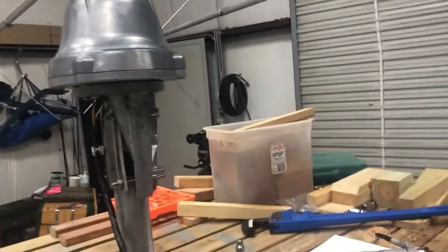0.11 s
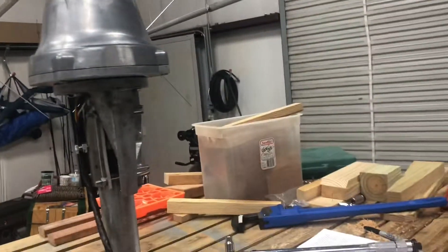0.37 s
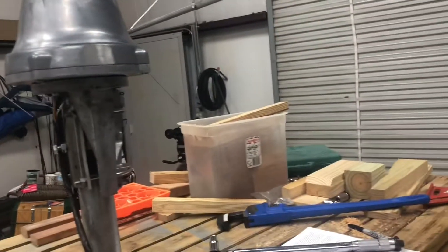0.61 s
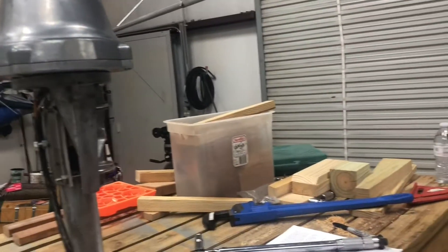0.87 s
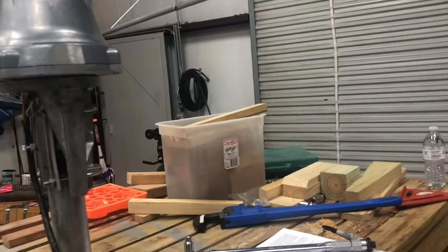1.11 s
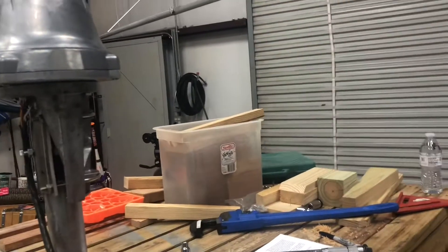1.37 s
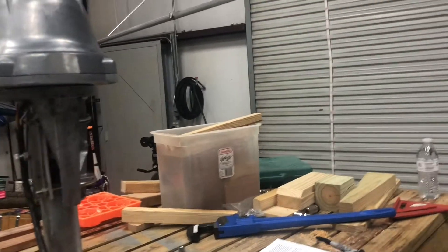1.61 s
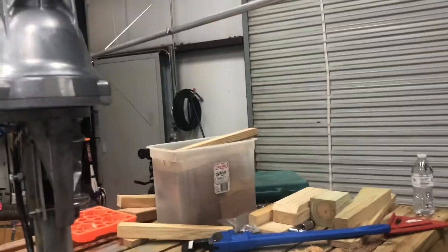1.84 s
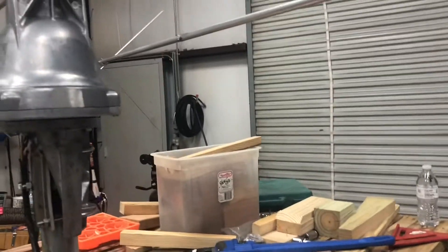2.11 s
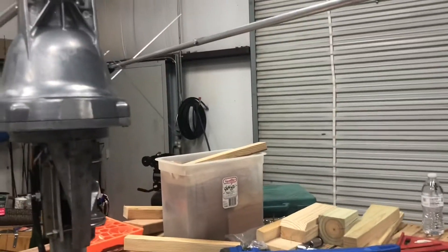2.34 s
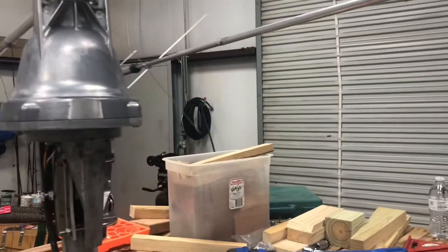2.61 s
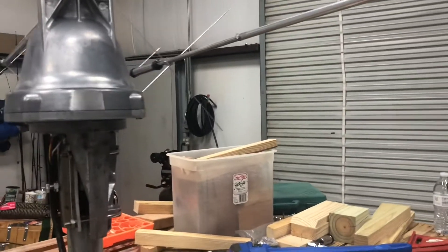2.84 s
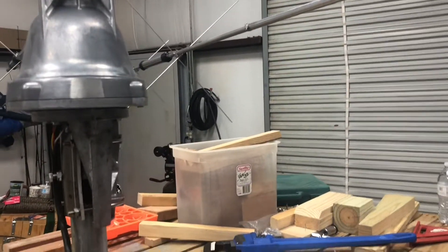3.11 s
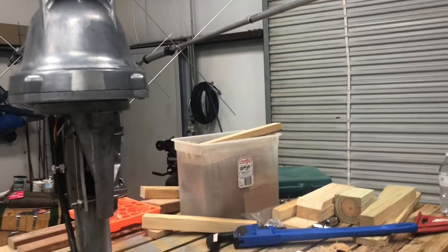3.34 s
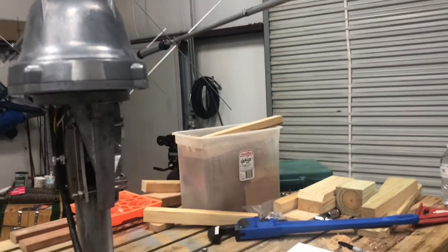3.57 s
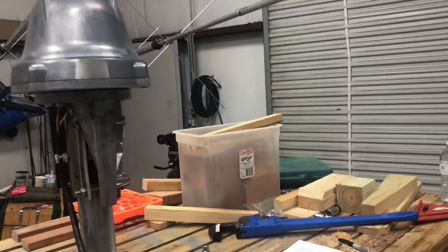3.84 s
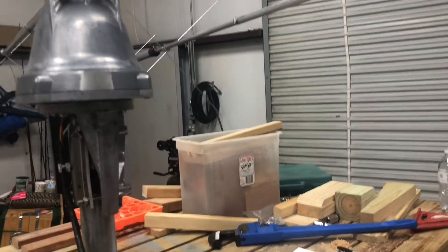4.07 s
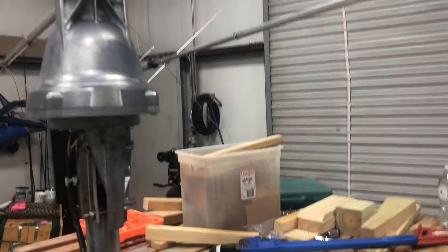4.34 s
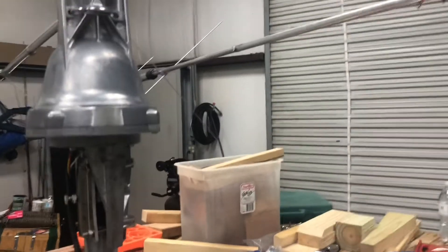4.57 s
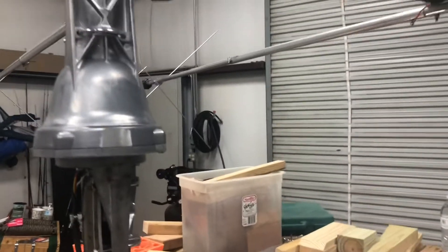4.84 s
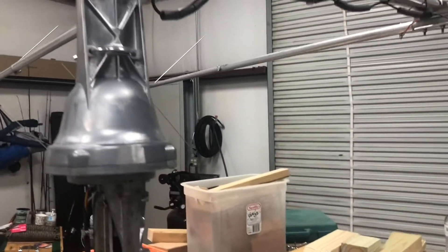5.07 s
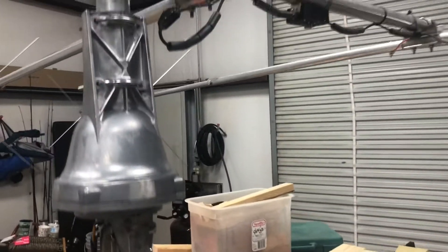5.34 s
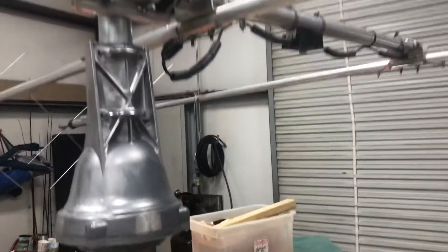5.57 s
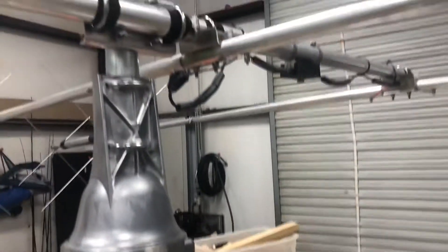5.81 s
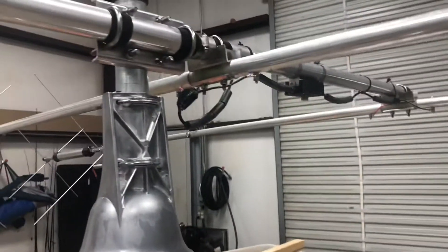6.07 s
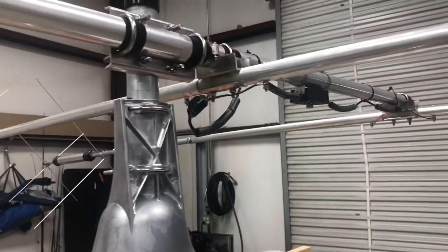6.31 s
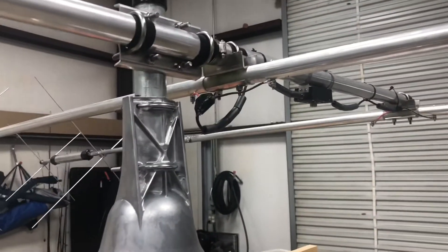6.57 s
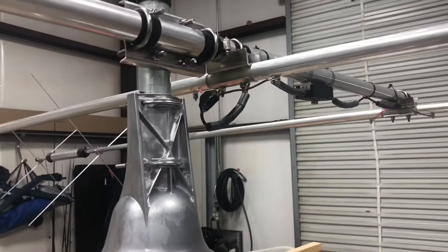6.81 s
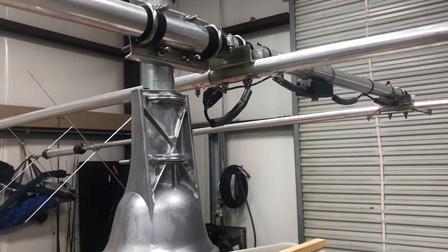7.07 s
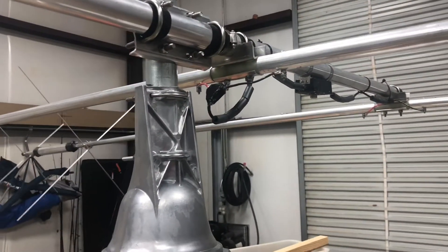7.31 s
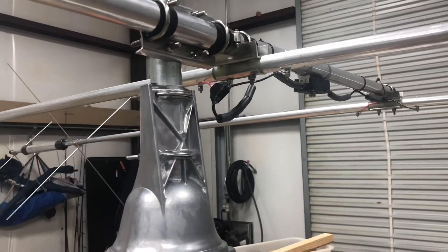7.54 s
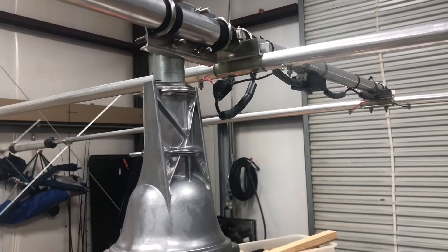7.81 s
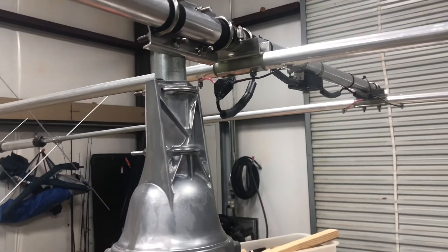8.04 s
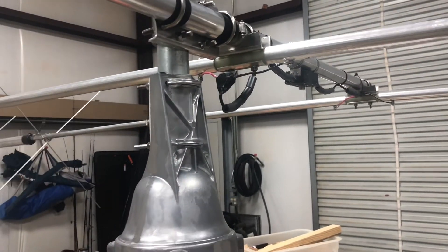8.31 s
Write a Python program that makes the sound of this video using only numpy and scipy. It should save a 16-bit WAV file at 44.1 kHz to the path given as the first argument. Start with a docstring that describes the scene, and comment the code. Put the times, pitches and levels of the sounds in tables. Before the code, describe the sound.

A handheld microphone moves from below a cast metal bell-shaped housing to above it. After quiet ticks, a small motor starts with a thump, its gears clattering and growling under a high nasal whine. Power drops, a few hollow knocks follow, then a second start and a long, steady rattling run with irregular gear clashes and slight sags in pitch, in a lightly echoing workshop.

```python
"""Small motor and gearbox in a metal bell

An induction motor turns an antenna in a workshop: a short run, a coast, then a long run to the end.
Rotor slots whine against the mains field, as sums of sine tones; the pinion sings when load slows the shaft.
Loose gears rattle, as dense random impacts that ring the cast housing and clash with the motor's slip.
The housing thumps at each start. Switches click and small knocks ring as short bursts and fading tones.
Quiet coloured noise is the room, with a hiss dying away at first and a low hum swelling in late."""
import sys
import numpy as np
from scipy import signal
from scipy.fft import rfft, irfft
from scipy.io import wavfile
from scipy.ndimage import uniform_filter1d

SR = 44100
rng = np.random.default_rng(int(sys.argv[2]) if len(sys.argv) > 2 else 0)


def boost(x):
    """Linear amplitude factor 10**(x/20) for a level x in decibels (scalar or array-like)."""
    u = np.asarray(x, float) / 20
    return 10 ** u


def unload_wav(signal):
    """Save mono or channel-first audio to the path in sys.argv[1] as 16-bit WAV at rate SR, clipped to [-1, 1]."""
    wavfile.write(
        sys.argv[1],
        SR,
        np.round(np.clip(np.atleast_2d(signal).T, -1, 1) * 32767).astype(np.int16),
    )


N = 371322
TIME = np.arange(N) / SR

MAINS_HZ = 60.0
STILL_S = 3.68  # the coasting gears come to rest
# when the motor has power: (on t/s, off t/s)
POWER = [(1.73, 2.97), (4.05, 8.5)]


def evened(x):
    """Scales a sound to rms 1."""
    return x / np.sqrt(np.mean(x ** 2) + 1e-20)


def read(points, hz):
    """Reads a spectrum between its points, on a log-frequency axis."""
    f, value = np.transpose(points)
    return np.interp(np.log(hz + 1), np.log(f + 1), value)


def add(mix, s, sound):
    """Mixes a sound in at s seconds."""
    part = mix[round(s * SR):][:len(sound)]
    part += sound[:len(part)]


def drift(rate_hz):
    """Smoothed chance of rms 1 that wanders about as fast as rate_hz."""
    steps = uniform_filter1d(rng.standard_normal(N // 100 + 2), size=5)
    slow = signal.lfilter([1], [1, -np.exp(-2 * np.pi * rate_hz * 100 / SR)], steps)
    return np.interp(np.arange(N) / 100, np.arange(len(slow)), evened(slow))


def coloured(db_of, gain):
    """Noise shaped to a given spectrum, evened, then scaled by the gain."""
    hz = np.fft.rfftfreq(N, 1 / SR)
    return gain * evened(irfft(rfft(rng.standard_normal(N)) * boost(db_of(hz)), N))


def bump(hz, centre_hz, width_hz, height):
    """A resonant peak: full height at its centre, half at half a width away."""
    return height / (1 + (2 * (hz - centre_hz) / width_hz) ** 2)


def hump(hz, centre_hz, octaves):
    """A broad rounded rise of height 1 on a log-frequency axis."""
    return np.exp(-(np.log2((hz + 1) / centre_hz) / octaves) ** 2)


def high_pass(x, edge_hz, order):
    """Keeps what lies above an edge."""
    return signal.sosfilt(signal.butter(order, edge_hz, "high", fs=SR, output="sos"), x)


def shaft_speed(t):
    """Turns a second, without unsteadiness; the shaft sags whenever the load bites."""
    # (t/s, speed/turns a second)
    speed_points = [(1.74, 52.05), (1.82, 51.6), (1.92, 47.9), (2.05, 45.2), (2.13, 46.9), (2.22, 50.65),
                    (2.3, 52.25), (2.66, 52.43), (2.9, 53.55), (2.94, 53.15), (3.04, 51.16), (3.11, 50.85),
                    (4.06, 52.4), (4.45, 52.3), (4.5, 51.5), (4.58, 48.8), (4.73, 47.6), (4.83, 50.4),
                    (4.96, 52.1), (5.01, 52.4), (5.56, 52.5), (5.76, 53.05), (5.95, 52.4), (6.81, 52.24),
                    (6.97, 50.8), (7.05, 50.55), (7.1, 50.7), (7.28, 52.34), (8.41, 52.44)]
    return np.interp(t, *np.transpose(speed_points))


def shaft_turns():
    """Turns of the shaft so far and how far the speed strays; load makes it unsteady."""
    free_speed = 52.4  # turns a second
    speed = shaft_speed(TIME)
    stray = np.minimum(abs(speed - free_speed), 3.5)
    unsteady = (0.045 + 0.052 * stray) * drift(21.0)
    return np.cumsum(speed + unsteady) / SR, stray


def from_above():
    """Share heard from above: the listener moves from below the bell to above it."""
    return np.interp(TIME, [4.9, 6.3], [0, 1])


def whine(turns, stray):
    """Slot passing beats with the field into sum tones; meshes are plain multiples of the shaft."""
    slots, teeth, second_teeth = 15, 12, 9
    second_db = -11.5  # a second mesh, against the pinion's
    flicker_db, wobble = 1.5, 0.04  # quick flicker of each tone in level (dB) and phase (cycles)
    delay_s, rise_s, fade_db_per_s = 0.029, 0.033, 153  # after power on, and after power off
    # speeds at which the tone levels are given: (speed/turns a second)
    tone_speeds = [45.3, 46.7, 47.8, 48.8, 50.2, 50.9, 51.5, 52.1, 53.4]
    # loudness at those speeds, heard from above: (lower slot whine/dB, upper slot whine/dB, pinion mesh/dB)
    tone_at_speed = [(-45, -50, -43.5), (-47, -64, -40.5), (-45, -48, -42.5), (-35, -39.5, -43.5),
                     (-45, -36, -50), (-59, -39.5, -50), (-35, -42, -55), (-38, -38.5, -56),
                     (-40.5, -37, -54.5)]
    # weaker partner tones: (multiple of the shaft turns, multiple of the mains)
    partners = [(16, 4), (14, 2), (15, 0), (15, -2), (15, 8), (22, 0), (1, 4), (0, 4), (0, 3)]
    # their levels against the upper whine: (level/dB)
    partner_db = [-4.5, -14.5, -17.5, -27.5, -10.5, -14, -25.5, -30, -35]
    # change when heard from below: (lower whine/dB, upper whine/dB, mesh/dB, high partners/dB, low partners/dB)
    from_below_db = (-2.5, -0.5, 3, -4, 2.5)

    speed, below, quick = shaft_speed(TIME), 1 - from_above(), drift(38)
    lower, upper, mesh = (np.interp(speed, tone_speeds, column) + db * below
                          for column, db in zip(np.transpose(tone_at_speed), from_below_db))
    # (multiple of the shaft, multiple of the mains, level in dB, size of the slow waver)
    tones = [(slots, 2, lower, 1.6), (slots, 4, upper, 1.8),
             (teeth, 0, mesh, 1.4), (second_teeth, 0, mesh + second_db, 2.5)]
    for (k, m), db in zip(partners, partner_db):
        change_db = from_below_db[3] if k > 1 else from_below_db[4]
        tones.append((k, m, upper + db + change_db * below, 2.5))

    out = np.zeros(N)
    for k, m, db, waver in tones:
        # every tone reads the same quick chance from its own starting points
        level_flicker, phase_flicker = (np.roll(quick, rng.integers(N)) for _ in range(2))
        level_db = db + waver * (0.5 + 0.027 * stray) * drift(3.3) + flicker_db * level_flicker
        cycles = k * turns + m * MAINS_HZ * TIME + rng.random() + wobble * phase_flicker
        out += boost(level_db) * np.sin(2 * np.pi * cycles)
    powered = sum(np.clip((TIME - on - delay_s) / rise_s, 0, 1)
                  * boost(-fade_db_per_s * np.maximum(TIME - off, 0)) for on, off in POWER)
    return np.sqrt(2) * out * powered


def slip_cycles():
    """Cycles of the beat at twice the slip between field and shaft, counted from a clash."""
    no_slip_speed = 59.905  # turns a second
    slip = np.cumsum(2 * (no_slip_speed - shaft_speed(TIME))) / SR
    return slip - np.where(TIME < STILL_S, 0.07, -0.6)  # where in the cycle each run clashes


def clash_rows():
    """One clash of chance size in every slip cycle under power, giving way to individually timed ones."""
    # individually timed clashes, strong and weak: (t/s, relative level/dB, bright first blow against it/dB)
    timed_clashes = [(1.801, -39, -15), (1.8262, -36, -22), (1.8786, -53, -30), (1.899, -52, -25),
                     (1.917, -36, -30), (1.935, -42, -28), (1.95, -36, -30), (1.9773, -46, -25),
                     (2.0, -42, -28), (2.1305, -41, -22), (2.075, -49, -28), (2.101, -46, -28),
                     (2.148, -39.5, -30), (2.204, -43, -20), (2.33, -52, -4), (2.394, -32, -11),
                     (2.4665, -45, -20), (2.502, -40, -3), (2.529, -49.5, 9), (2.652, -45, 5),
                     (2.667, -56, 3), (2.7104, -32, -25), (2.866, -40, -19), (2.951, -43, -13),
                     (4.14, -34.5, -6), (4.148, -39, -9), (4.2013, -40, -3), (4.238, -38, -7),
                     (4.2864, -41, -6), (4.312, -43, -4), (4.321, -35, -9), (4.371, -44, -10),
                     (4.444, -39, -12), (4.4969, -40, -18), (4.52, -45, -25), (4.585, -36.5, -16),
                     (4.605, -35.5, -26), (4.6326, -44, -25), (4.667, -47, -22), (4.688, -39.5, -24),
                     (4.7374, -38, -23), (4.751, -35, -27), (4.7788, -45, -16), (4.8387, -43, -14),
                     (4.9235, -60, -12), (5.09, -43, -5), (5.135, -38, -7), (5.2323, -37.5, -7),
                     (5.3505, -40, -18), (5.4687, -33, -23), (5.6044, -37, -20), (5.8389, -42, -16),
                     (5.855, -36, -25), (6.0469, -40, -14), (6.3387, -40, -6), (6.681, -35.5, -12),
                     (6.8864, -40, -10), (6.9514, -49, -20), (7.042, -35, -22), (7.075, -35, -14),
                     (7.1344, -42.5, -13), (7.2262, -59, -13), (7.2931, -41, -15), (7.551, -37, -20),
                     (7.942, -41.5, -4), (8.0758, -36.5, -17), (8.1007, -41, -7), (8.2095, -35.5, -16),
                     (8.334, -42, -25)]
    usual_db, usual_bright_db, spread_db, jitter_s = -47, -26, 3, 0.004  # levels as in the table
    timed = np.array(timed_clashes)
    s = TIME[1:][np.diff(np.floor(slip_cycles())) > 0]
    chance = rng.standard_normal((len(s), 3))
    s = s + jitter_s * chance[:, 0]
    powered = np.any([(s > on + 0.04) & (s < min(off, TIME[-200])) for on, off in POWER], 0)
    free = abs(s[:, None] - timed[:, 0]).min(1) > 0.03
    size = [usual_db, usual_bright_db] + spread_db * chance[:, 1:]
    return np.r_[timed, np.c_[s, size][powered & free]]


def housing(heard_above):
    """Causal (minimum-phase) response of the cast bell: broad colour with resonant peaks."""
    # broad colour: (f/Hz, gain/dB)
    broad_colour = [(88, -60), (150, -34.5), (291, -13), (464, -18.5), (598, -10), (833, -10.5),
                    (883, -13.5), (1030, -5), (1500, -16), (2740, -22.5), (3200, -28), (3810, -25.5),
                    (5850, -26), (7110, -34.5), (15800, -61.5)]
    # ringing peaks: (f/Hz, width/Hz, height heard from below/dB, height heard from above/dB)
    bell_modes = [(330, 61, 2, 3), (410, 83, 10.5, 10.5), (560.5, 75, 9.5, 7), (967, 96, 7, 1.5),
                  (1159, 23, 2, 10.5), (1288, 20, 0, 10), (1375, 22, 11, 6), (1597, 26, 3, 9.5),
                  (1709, 197, 12, 3), (2028, 59, 7, 4), (2170, 84, 4.5, 2), (2510, 18, 8, 9),
                  (2740, 83, 0, 4), (2925, 90, 7, 3), (3446, 90, 5.5, 0.5), (3890, 75, 3, 10.5),
                  (4130, 61, 2, 1), (4440, 140, 1.5, -1), (5080, 104, 3, 4.5), (5780, 74, -4, 3),
                  (5850, 73, -3, 4.5), (6400, 150, 1, 8.5), (8750, 150, 9, 8.5), (9350, 45, 9, 12),
                  (10240, 370, -1, 1), (12400, 780, 4, 4), (14800, 450, 11, 14)]
    hz = abs(np.fft.fftfreq(8192, 1 / SR))
    peaks = sum(bump(hz, f, width, above if heard_above else below) for f, width, below, above in bell_modes)
    log_gain = np.log(boost(np.maximum(read(broad_colour, hz) + peaks, -100)))
    return np.fft.ifft(np.exp(np.conj(signal.hilbert(log_gain)))).real[:4096]


def through_bell(x):
    """Rings the bell, as heard first from below, then from above."""
    above = from_above()
    low_side = signal.oaconvolve(x * (1 - above), housing(heard_above=False))[:N]
    high_side = signal.oaconvolve(x * above, housing(heard_above=True))[:N]
    return low_side + high_side


def steady_rattle(grains, stray):
    """Rings the bell with tooth impacts, then steers bass, middle and treble as the motion changes."""
    # level aimed at for 1.3-3 kHz before the finer shaping: (t/s, level/dB)
    middle_level = [(1.73, -58), (1.76, -49), (1.95, -46.5), (2.25, -47.5), (2.66, -48.5), (2.74, -43),
                    (2.85, -41.5), (2.97, -40.5), (3.05, -49.5), (3.14, -71.5), (3.24, -73), (3.3, -71),
                    (3.45, -69), (3.54, -75.5), (3.68, -88), (4.05, -47), (4.16, -45), (4.5, -42.5),
                    (4.6, -40.5), (4.8, -42.5), (4.94, -39.5), (4.98, -47.5), (5.5, -43), (5.85, -42),
                    (6.18, -46), (6.85, -42.5), (7.08, -41.5), (7.26, -45), (8.16, -45), (8.42, -47)]
    # in the short run the gears turn the other way and ring other parts: (f/Hz, width/Hz, height/dB)
    reverse_colour = [(1680, 150, -2), (2110, 300, 6), (2940, 140, 1), (3420, 220, 3), (4170, 260, 7.5)]
    z_hz, frames, z = signal.stft(through_bell(grains * boost(1.29 * drift(58))), SR, nperseg=512, noverlap=384)
    power = (abs(z) ** 2).mean(1)
    bands = [(1300, 3000), (3500, 12000), (230, 520)]
    middle, high, low = (10 * np.log10(power[(z_hz > lo) & (z_hz < hi)].sum()) for lo, hi in bands)
    hz = z_hz[:, None]
    mid_db = np.interp(frames, *np.transpose(middle_level))
    straying = np.interp(frames, TIME, stray)
    starting = sum((frames > on - 0.02) * np.exp(-np.maximum(frames - on, 0) / 0.042) for on, off in POWER)

    # treble: steady, brighter once the speed strays, held under the middle; it builds up after a start
    treble_db = -55 + 3.5 * np.minimum(straying / 0.51, 1) - 15.5 * starting
    coasting = (frames > POWER[0][1]) & (frames < POWER[1][0])
    treble_db = np.minimum(treble_db - mid_db, np.where(coasting, -7.5, -6))
    # bass: steady, at most 2 dB over the middle except for a boom at each start
    bass_db = np.minimum(-50.5 - mid_db, 2) + 13 * starting
    shape_db = np.clip((hz - 2800) / 700, 0, 1) * (treble_db - high + middle)
    shape_db += np.clip((1150 - hz) / 500, 0, 1) * (bass_db - low + middle)

    # growl grows as the speed strays: dB per turn a second
    shape_db += 1.36 * hump(hz, 2740, octaves=0.47) * straying
    # grit grows while the speed is changing: dB per turn a second squared
    changing = abs(np.gradient(shaft_speed(frames), frames))
    shape_db += 0.13 * hump(hz, 4200, octaves=0.6) * uniform_filter1d(changing, size=20)
    shape_db += sum(bump(hz, f, width, db) for f, width, db in reverse_colour) * (frames < STILL_S)
    # the treble swells with every slip cycle, 0.32 cycles after the clash
    flutter = np.cos(2 * np.pi * (np.interp(frames, TIME, slip_cycles()) - 0.32)) / (1 + straying)
    shape_db += 2.5 * np.clip((hz - 1500) / 2500, 0, 1) * flutter
    # the contact wanders, so patches of the spectrum swell and fade
    patches = uniform_filter1d(rng.standard_normal(z.shape), size=7, axis=0)
    patches = evened(uniform_filter1d(patches, size=14, axis=1))
    shape_db += (1.54 + 1.4 * np.clip((hz - 8000) / 4000, 0, 1)) * patches

    shaped = signal.istft(z * boost(mid_db - middle + shape_db), SR, nperseg=512, noverlap=384)[1][:N]
    moving = (TIME > POWER[0][0]) & ((TIME < STILL_S) | (TIME > POWER[1][0]))
    return shaped * uniform_filter1d(moving * 1.0, size=200)


def rasp(loaded):
    """Under load a clash also rings lower parts of the bell, other ones in each run."""
    # one list for the short run, one for the long: (f/Hz, width/Hz, gain at one turn a second astray/dB)
    rasp_modes = [
        [(2020, 260, 4), (2480, 220, -15), (3480, 200, -6), (4060, 220, -6)],
        [(1730, 140, -1), (2070, 200, -6), (2480, 200, -8), (2940, 260, -0.5), (3360, 140, -15)],
    ]
    out = np.zeros(N)
    for run, modes in zip((TIME < STILL_S, TIME > STILL_S), rasp_modes):
        for f, width, db in modes:
            out += boost(db) * signal.lfilter(*signal.iirpeak(f, f / width, SR), loaded * run)
    return out


def clashes(impacts, grains, stray):
    """Gear backlash closing: a sharp first blow, brightest, with a short flurry of impacts."""
    s, clash_db, bright_db = clash_rows().T
    blows, bright, t = np.zeros(N), np.zeros(N), TIME[:4000]
    at = np.round(s * SR).astype(int)
    blows[at] = boost(clash_db)
    bright[at] = boost(clash_db + bright_db)
    flurry_shape = boost(-60 * (t / 0.03) ** 2) * (1 - np.exp(-t / 0.00054))
    first_shape = boost(-60 * t / 0.049) * (1 - np.exp(-t / 0.00043))
    flurry = evened(grains) * signal.oaconvolve(blows, flurry_shape)[:N]
    first = evened(impacts) * signal.oaconvolve(bright, first_shape)[:N]
    sharp = high_pass(flurry, 4700, order=1) + boost(19.5) * high_pass(first, 11500, order=2)
    bell_gain = np.linalg.norm(high_pass(housing(heard_above=True), 3950, order=2))
    return boost(-7) * through_bell(sharp) / bell_gain + rasp(stray * flurry)


def rattle(turns, stray):
    """Dense random tooth impacts, throbbing with the field and the shaft, rattle and clash."""
    impacts = (rng.random(N) < 22000 / SR) * rng.standard_normal(N)
    field_throb = 1 + 0.15 * np.cos(4 * np.pi * MAINS_HZ * TIME)
    shaft_throb = 1 + 0.28 * np.cos(4 * np.pi * turns)
    grains = impacts * field_throb * shaft_throb
    return steady_rattle(grains, stray) + clashes(impacts, grains, stray)


def jolts():
    """The housing thumps as the brake lets go at each start: a few low tones die away."""
    # (t/s, relative level/dB)
    jolt_times = [(1.7303, -31.5), (4.0513, -33)]
    # ringing: (f/Hz, level/dB, time to fall 60 dB/s)
    jolt_modes = [(340, -3.5, 0.12), (415, 3.5, 0.075), (540, -14, .06), (664, -2, 0.06), (687, -25, 0.042)]
    out, t = np.zeros(N), TIME[:8000]
    ring = sum(boost(d - 60 * t / t60) * np.sin(2 * np.pi * f * t) for f, d, t60 in jolt_modes)
    for s, db in jolt_times:
        add(out, s, boost(db) * ring * (1 - np.exp(-(t / 0.0015) ** 2)))
    return out


def ticks():
    """Switches and relays: a burst through the short resonances of a box, then a faint broad hiss."""
    # (t/s, relative level at 3-7 kHz/dB, low end/dB, top end/dB, time to fall 60 dB/s, trailing hiss/dB)
    tick_list = [(0.54, -51.5, -9, -3.5, 0.023, -41), (1.0051, -62.5, 3, 10, 0.024, -44),
                 (1.0185, -64.5, 4, 0, 0.035, -30), (1.3053, -54, -2, -12, 0.033, -38),
                 (1.3608, -45.5, 1.5, -10.5, 0.033, -11.5), (1.7122, -49.5, 1, -11, 0.088, -12),
                 (1.729, -40, 4, -14, 0.034, -39), (4.0232, -52, 7.5, -4, 0.07, -23),
                 (4.0432, -43.5, 4, -35, 0.032, 7)]
    # resonances: (f/Hz, width/Hz, peak gain/dB)
    tick_ring = [(1110, 2500, 0.5), (2170, 350, -9), (3740, 530, 0), (4560, 480, 0), (5760, 920, -8),
                 (8240, 850, 7.5), (9500, 380, 4.5), (11600, 700, -4), (13700, 1000, -2)]
    # colour of the trailing hiss: (f/Hz, gain/dB)
    trail_colour = [(1500, -22), (5000, -9), (7500, -22), (10500, 8), (13500, -10)]
    out, t, hz = np.zeros(N), TIME[:12000], np.fft.rfftfreq(12000, 1 / SR)
    ring = sum(bump(hz, f, width, boost(db)) for f, width, db in tick_ring)
    for s, db, low_db, top_db, t60, trail_db in tick_list:
        tilt = boost(np.interp(hz, [2500, 3000, 7000, 7500], [low_db, 0, 0, top_db]))
        spectrum = rfft(rng.standard_normal(12000)) * tilt
        burst = irfft(spectrum * ring) * boost(-60 * t / t60) * (1 - np.exp(-t / 0.00049))
        trail = irfft(spectrum * boost(read(trail_colour, hz)))
        trail = trail * boost(trail_db - 60 * t / 0.5) * np.clip(t / 0.022, 0, 1) ** 2
        add(out, s, boost(db) * 2.63 * (burst + trail))
    return out


def ping():
    """A short ring of drooping pitch after a loud switch click."""
    s, start_hz, droop_hz_per_s, db, t60 = 1.366, 945, -1700, -50, 0.05
    t = TIME[:12000]
    out = np.zeros(N)
    fade = boost(db - 60 * (t / t60) ** 2) * np.minimum(t / 0.0037, 1)
    add(out, s, fade * np.sin(2 * np.pi * (start_hz + droop_hz_per_s * t / 2) * t))
    return out


def knocks():
    """Brief blows on metal ring the same modes, most near each blow's centre, with a dry snap."""
    # (t/s, relative level/dB, centre of the blow f/Hz, factor on ring time)
    knock_list = [(0.333, -58, 947, 0.64), (0.558, -53, 1000, 0.5), (0.568, -54, 369, 0.4),
                  (0.615, -49, 422, 0.43), (1.45, -40, 1010, 0.35), (1.456, -49, 400, 0.5),
                  (3.285, -45, 370, 0.44), (3.303, -45, 830, 0.98), (3.322, -46, 837, 0.86),
                  (3.33, -44, 400, 0.37), (3.368, -48, 930, 0.6), (3.386, -42.5, 378, 0.84),
                  (3.406, -46, 820, 0.55), (3.422, -48, 1000, 0.52), (3.473, -43, 1350, 0.4),
                  (3.478, -44, 420, 0.51), (3.485, -36, 756, 0.35), (3.501, -35, 400, 0.28),
                  (3.503, -47, 1000, 0.5), (3.5658, -46, 1570, 0.94), (3.6423, -54, 1320, 0.86),
                  (3.7139, -30, 1590, 0.51), (3.7139, -38, 2980, 0.57), (3.739, -41, 1290, 0.5),
                  (3.915, -48, 1260, 1.2), (3.9474, -40, 1640, 0.61), (3.9968, -47, 1240, 0.75),
                  (4.4444, -24, 1400, 0.4), (4.4442, -26, 3300, 0.59), (5.991, -29, 1670, 0.51)]
    # (f/Hz, level/dB, time to fall 60 dB/s)
    knock_modes = [(373, 12, 0.079), (545, -14, 0.061), (830, 5, 0.079), (960, -3, 0.09),
                   (1085, -0.5, 0.13), (1360, 10.5, 0.029), (1570, -2.5, 0.08), (1774, -3, 0.074),
                   (2190, -4, 0.099), (2400, -14, 0.04), (2860, -1, 0.03), (3750, -16, .035),
                   (4250, -8, 0.032)]
    spread_db = 2.5  # how unevenly a blow shares itself among the modes
    out, t, hz = np.zeros(N), TIME[:8000], np.fft.rfftfreq(8000, 1 / SR)
    for s, db, centre_hz, damping in knock_list:
        ring = np.zeros(len(t))
        for f, mode_db, t60 in knock_modes:
            chance = rng.standard_normal()
            level_db = mode_db - 11.5 * np.log2(f / centre_hz) ** 2 + spread_db * chance
            tone = np.sin(2 * np.pi * f * (1 + 0.014 * chance) * t)
            ring += boost(level_db - 60 * t / (t60 * damping)) * tone
        snap_colour = boost(-9 * np.log2((hz + 1) / (1.03 * centre_hz)) ** 2)
        snap = evened(irfft(rfft(rng.standard_normal(8000)) * snap_colour))
        snap = boost(-15.5 - 60 * t / (0.071 * damping)) * snap
        rise_s = 0.0003 * (1400 / centre_hz) ** 2.4  # duller blows rise more slowly
        add(out, s, boost(db) * (1 - np.exp(-t / rise_s)) * (1.68 * ring / abs(ring).max() + snap))
    return out


def shop(x):
    """Workshop echo: sparse reflections of random sign, each band dying at its own speed."""
    # (f/Hz, time to fall 60 dB/s)
    shop_fade = [(200, 1), (1000, 0.5), (4000, 0.6), (12000, 0.74)]
    taps = np.zeros(SR)
    at = np.arange(400, SR - 20, 20)
    taps[at + rng.integers(0, 20, len(at))] = rng.choice([-1.0, 1.0], len(at))
    hz, t, z = signal.stft(taps, SR, nperseg=256)
    tail = signal.istft(z * boost(-60 * t / read(shop_fade, hz)[:, None]), SR, nperseg=256)[1]
    return signal.fftconvolve(x, tail / np.linalg.norm(tail))[:N]


def background():
    """Lumpy low room noise, microphone hiss, a fading hiss at first and a late hum."""
    # colour of room and microphone noise: (f/Hz, relative level/dB)
    air_colour = [(15, -52), (25, -28), (43, -4), (126, -3), (174, -7.5), (255, -9.5), (557, -18),
                  (1250, -25.5), (1390, -27.5), (1510, -27), (15800, -39.5)]
    # a low hum that swells in late: (t/s, level before its slow waver/dB)
    hum_level = [(5.9, -95), (6.6, -67), (8.42, -66)]
    air = coloured(lambda hz: read(air_colour, hz), boost(-64))
    low = signal.sosfiltfilt(signal.butter(2, 300, fs=SR, output="sos"), air)
    air = air - low + low * boost(2.0 * drift(9) - 1.0)
    # centred on 2100 Hz, falling 60 dB in 0.46 s
    fading = coloured(lambda hz: -4.5 * np.log2((hz + 1) / 2100) ** 2, boost(-62 - 60 * TIME / 0.46))
    hum_db = np.interp(TIME, *np.transpose(hum_level)) + 2.0 * drift(2.4)
    hum = boost(hum_db) * np.sqrt(2) * np.sin(2 * np.pi * 86.1 * TIME)
    return air + fading + hum


def scene():
    """Motor near; the room answers the small dry sounds slightly more than the gears."""
    turns, stray = shaft_turns()
    gears = rattle(turns, stray) + jolts()
    small = ticks() + ping() + knocks()
    room = shop(boost(-10.5) * gears + boost(-10.0) * small)
    return (whine(turns, stray) + gears + small + room + background())[None]


def low_pass(x):
    """Removes everything above the highest recorded frequency."""
    return signal.sosfilt(signal.butter(12, 16800, fs=SR, output="sos"), x)


def record(dry):
    """The microphone drops the deepest bass."""
    heard = high_pass(dry, 40, order=5)
    return low_pass(heard)


dry = scene()
out = record(dry)
unload_wav(out)
```